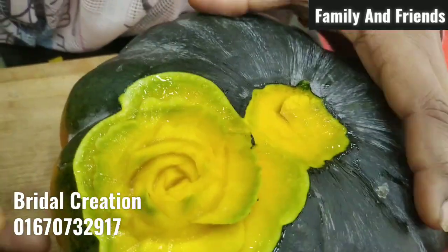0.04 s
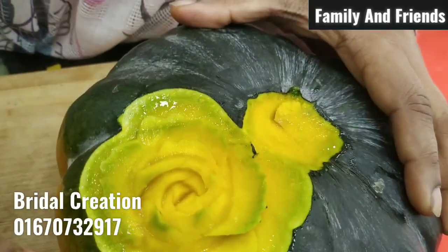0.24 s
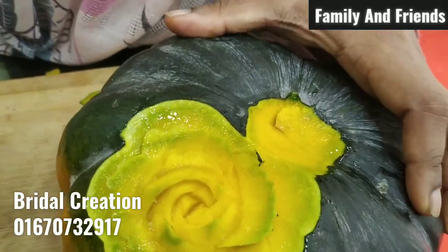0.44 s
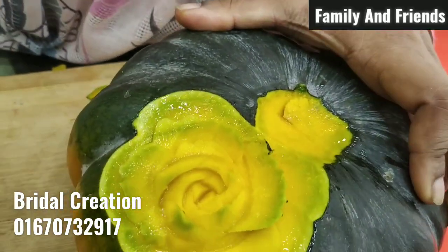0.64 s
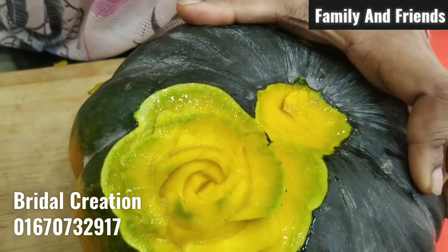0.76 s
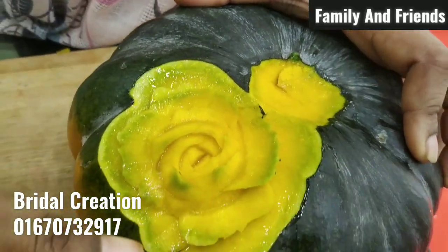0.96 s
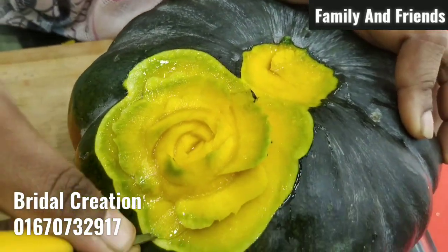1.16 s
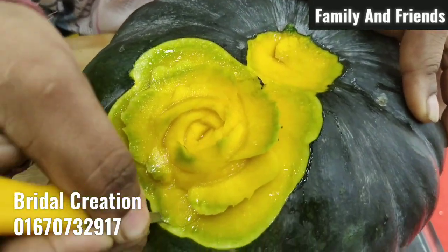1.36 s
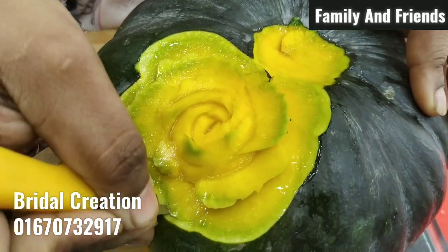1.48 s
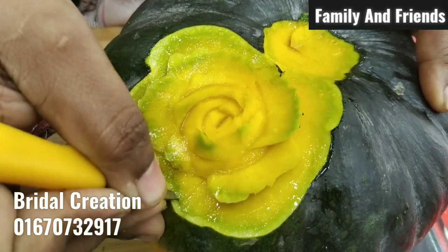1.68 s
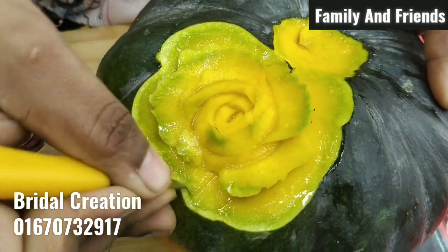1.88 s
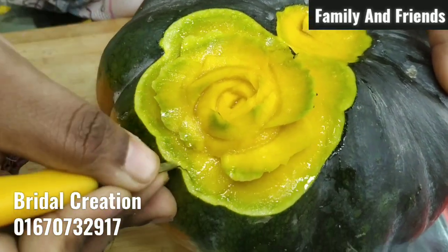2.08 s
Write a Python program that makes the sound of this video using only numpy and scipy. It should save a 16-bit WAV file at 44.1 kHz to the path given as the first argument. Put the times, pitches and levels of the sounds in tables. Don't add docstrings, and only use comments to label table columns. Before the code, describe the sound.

A small blade carves pumpkin rind, close and dry in a quiet room with low hum and faint hiss. Until 0.55 s the fruit shudders low on its board under a biting scrape, a softer drag and tiny snaps. From 0.64 to 1.05 s crisp cracks come in a row, then sparser ones at 1.28, 1.54 and 1.83-1.94 s. Low air puffs buffet the left around 1.4 and 1.8-2.1 s, with soft taps late.

```python
import sys
import numpy as np
from scipy import signal
from scipy.fft import rfft, irfft
from scipy.io import wavfile

SR = 44100
rng = np.random.default_rng(int(sys.argv[2]) if len(sys.argv) > 2 else 0)


def level_to_linear(level):
    exponent = np.asarray(level, float) / 20
    return 10 ** exponent


def wrap_up_sound(samples):
    columns = np.atleast_2d(samples).T
    tamed = np.clip(columns, -1, 1)
    steps = np.round(tamed * 32767).astype(np.int16)
    wavfile.write(sys.argv[1], SR, steps)


N = 93315

# f/Hz, level/dB per Hz
ROOM_SPECTRUM = [(20, -6), (60, 3), (110, -10), (200, -15.5), (450, -20), (1100, -29.5), (4500, -36.5)]
# f/Hz, correlation/1
ROOM_LIKENESS = [(60, 0.72), (240, 0.86), (950, 0.13), (3770, 0.11), (15000, -0.23)]
# f/Hz, width/Hz, level/dB
ROOM_MODES = [(150.5, 11.2, -58), (241, 30, -66), (374.2, 20.6, -66)]
# f/Hz, level/dB per Hz
HISS_SPECTRUM = [(1000, -2), (3000, 33.5), (5000, 27), (7000, -51), (11000, 2), (16000, -17.5)]
ROOM_DB, HISS_DB, HISS_RIGHT_DB, HISS_PATCH_DB = -48.5, -70, -2.5, 2

# t/s, level/dB
GUST_LEVEL = [(0, -43), (.3, -37.5), (.5, -43), (.7, -39), (.85, -40.5), (1.1, -38.5), (1.4, -37.5),
              (1.72, -40.5), (1.8, -26.5), (2.05, -27.5), (2.2, -58)]
GUST_CUT_HZ, GUST_LUMPS_DB = 47.3, 0.06
SWAY_DB, SWAY_HZ = -35, 6.7

# t/s, level/dB
SHUDDER_LEVEL = [
    (.04, -42),
    (.07, -31.5),
    (.12, -65),
    (.27, -42),
    (.31, -35),
    (.44, -36),
    (.49, -49),
]
SHUDDER_ORDERS_DB = [0.5, -15.5, -22, -19.5]
SHUDDER_HZ = 77.4

# t/s, level/dB
RUB_STROKES = [
    [(.064, -80), (.07, -51), (.094, -54), (.099, -42), (.108, -38), (.135, -40), (.16, -46), (.2, -52),
     (.31, -61)],
    [(.316, -70), (.319, -49), (.345, -49), (.36, -55), (.44, -59), (.495, -54), (.515, -60), (.55, -58),
     (.58, -70)],
]
# f/Hz, level/dB per Hz
RUB_SPECTRUM = [(300, -7), (900, -7.5), (1600, -7), (3000, -8), (6000, -1), (12000, 4.5), (16000, -1)]
RUB_LOW_DB = [5, -0.5]
RUB_GAIN_DB, RUB_GRAIN_DB = 3.5, 3.0
RUB_FLICKER_DB, RUB_FLICKER_HZ = 1.6, 90

# t/s, peak/dB, length/s, flesh/dB, edge/dB
FIRST_BITE = (.098, -35, .004, 12, -3)
# t/s, peak/dB, length/s, flesh/dB, edge/dB
SLIPS = [(0.6397, -43.5, 0.0065, -6, 7), (0.6758, -33.5, 0.0079, -1, 0), (0.7141, -25.5, 0.0054, 0, -4),
         (0.7668, -22.5, 0.0052, 1.5, -1.5), (0.836, -21.5, 0.0049, 1, -1.5),
         (0.9194, -22, 0.0051, 1.5, 2.5), (1.0242, -22.5, 0.0063, -1.5, 1), (1.283, -27, 0.0048, -5.5, 2.5),
         (1.5419, -22.5, 0.0053, -3.5, 2), (1.8327, -21, 0.0045, 1, -1), (1.8981, -25, 0.0052, -2, -0.5),
         (1.9433, -22, 0.0052, -8.5, -2.5)]
# f/Hz, width/Hz, level/dB
FLESH_MODES = [(390, 216, -8), (1100, 430, -13.5), (1730, 198, -6.5), (2912, 187, -9.5)]
BLADE_MODES = [(3800, 310, -6), (4463, 252, -1.5), (5090, 480, -7), (6370, 610, -0.5), (8660, 610, -4)]
EDGE_MODES = [(10790, 2180, -2), (13270, 1570, 2), (14100, 1480, 2)]
SLIP_RISE_S, SLIP_FALL_S = .0015, .0007
SLIP_GAIN_DB, SLIP_GRAIN_DB = 1, 3
FIBRES_PER_S, FIBRES_SHARED = 14000, .45

# t/s, peak/dB
SNAPS = [
    (0.218, -39),
    (0.243, -37),
    (0.3414, -33),
    (0.3897, -34.5),
    (0.4004, -35.5),
    (0.4224, -58),
    (0.4577, -38),
    (0.5003, -34.5),
]
# t/s, level/dB
CONTACT_LEVEL = [(.55, -57.5), (.66, -61.5), (1.06, -60), (1.13, -65), (1.17, -55.5), (1.28, -57.5),
                 (1.33, -91), (1.5, -73), (1.56, -68), (1.62, -97), (1.74, -59), (1.8, -57), (1.96, -58.5),
                 (2.05, -63.5), (2.08, -57.5), (2.2, -64)]
CONTACT_CUT_HZ = 7500

# t/s, level/dB, f/Hz
PUFFS = [(0.923, -27, 46.4), (1.014, -37.5, 90.5), (1.411, -15.5, 53.6), (1.441, -18, 76),
         (1.455, -22.5, 37.7), (1.792, -12.5, 52), (1.819, -17, 45.7), (1.867, -17, 45.6),
         (1.901, -9.5, 39.8), (1.962, -11.5, 52), (1.987, -15, 47), (2.02, -11.5, 45), (2.053, -18, 47.5),
         (2.077, -22, 65)]
PUFF_CYCLES, PUFF_SUCK_SPEED = 0.43, 1.384
# t/s, level/dB
TAPS = [(2.1, -37.5), (1.885, -31), (1.951, -40.5), (1.971, -37.5), (1.783, -43.5), (2, -62), (2.005, -46),
        (2.1, -43.5)]
TAP_HZ, TAP_WIDTH_HZ, TAP_S = 430, 590, .0004

# f/Hz, width/Hz, level/dB
LEFT_CAVITY = [(4970, 400, -0.5), (6240, 400, 8)]
LEFT_LAG_S, LEFT_CUT_HZ, LEFT_DB = .00048, 5660, 2.5
ECHO_DB, ECHO_DELAY_S, ECHO_T60_S, ECHO_HZ = -40.5, 0.0052, 0.29, 4220
CUTOFF_HZ, FADE_S = 16050, .012


def in_time(rows):
    s, v = np.transpose(rows)
    return np.interp(np.arange(N) / SR, s, v, left=-120, right=-120)


def at_hz(points, hz):
    f, v = np.transpose(points)
    return np.interp(np.log(hz), np.log(f), v)


def bins_hz():
    return np.maximum(np.arange(N // 2 + 1) * SR / N, 10)


def rms_one(x):
    return x / np.sqrt(np.mean(x ** 2) + 1e-20)


def cut(x, hz, kind, order=2):
    return signal.sosfilt(signal.butter(order, hz, kind, fs=SR, output="sos"), x)


def drift(rate_hz):
    r = np.exp(-2 * np.pi * rate_hz / SR)
    walk = signal.lfilter([1], [1, -2 * r, r * r], rng.standard_normal(N + SR))
    return rms_one(walk[SR:])


def slow_air(low_hz, high_hz, order):
    low = cut(rng.standard_normal(N + SR), high_hz, "low", order)
    return rms_one(cut(low, low_hz, "high")[SR:])


def resonate(x, peaks):
    out = 0
    for k, (hz, width_hz, db) in enumerate(peaks):
        r = np.exp(-np.pi * width_hz / SR)
        b = (1 - r * r) / 2 * level_to_linear(db) * (-1) ** k
        poles = [1, -2 * r * np.cos(2 * np.pi * hz / SR), r * r]
        out = out + signal.lfilter([b, 0, -b], poles, x + 1e-18)
    return out


def colour(x, points):
    return irfft(rfft(x) * level_to_linear(at_hz(points, bins_hz())), N)


def grains(spread_db):
    sizes = level_to_linear(spread_db * np.minimum(rng.exponential(1, (2, N)), 4))
    signed = sizes * rng.choice([-1, 1], (2, N))
    own, right = signed * (rng.random((2, N)) < FIBRES_PER_S / SR)
    left = np.sqrt(FIBRES_SHARED) * right + np.sqrt(1 - FIBRES_SHARED) * own
    return rms_one(np.array([left, right]))


def room_tone():
    mid, side = rfft(colour(rng.standard_normal((2, N)), ROOM_SPECTRUM))
    alike = np.clip(at_hz(ROOM_LIKENESS, bins_hz()), -1, 1)
    hum = irfft(np.sqrt(1 + alike) * mid + np.sqrt(1 - alike) * side * [[1], [-1]], N)
    modes = np.zeros(N)
    for hz, width_hz, db in ROOM_MODES:
        modes += level_to_linear(db) * rms_one(resonate(rng.standard_normal(N), [(hz, width_hz, 0)]))
    hiss = rms_one(colour(rng.standard_normal((2, N)), HISS_SPECTRUM))
    hiss = hiss * level_to_linear(HISS_DB + HISS_PATCH_DB * drift(18)) * level_to_linear(np.array([[0], [HISS_RIGHT_DB]]))
    return level_to_linear(ROOM_DB) * rms_one(hum) + modes + hiss


def gusts():
    gust = slow_air(9.6, GUST_CUT_HZ, order=3)
    sway = level_to_linear(SWAY_DB) * slow_air(2.9, SWAY_HZ, order=2)
    return gust * level_to_linear(in_time(GUST_LEVEL) + GUST_LUMPS_DB * drift(20)) + sway


def shudder():
    phase = 2 * np.pi * np.cumsum(SHUDDER_HZ * (1 + 0.034 * drift(23))) / SR
    tone = sum(level_to_linear(db) * np.sin((k + 1) * phase) for k, db in enumerate(SHUDDER_ORDERS_DB))
    return tone * level_to_linear(in_time(SHUDDER_LEVEL))


def rubs():
    flicker_db = RUB_FLICKER_DB * drift(RUB_FLICKER_HZ)
    grain = rms_one(colour(grains(RUB_GRAIN_DB), RUB_SPECTRUM)) * level_to_linear(RUB_GAIN_DB + flicker_db)
    low, high = cut(grain, 2800, "low"), cut(grain, 3050, "high")
    out = np.zeros((2, N))
    for stroke, low_db in zip(RUB_STROKES, RUB_LOW_DB):
        out += level_to_linear(in_time(stroke)) * (high - level_to_linear(low_db) * low)
    return out


def slips():
    t, tear = np.arange(N) / SR, grains(SLIP_GRAIN_DB)
    flesh, blade, edge = np.zeros((3, 2, N))
    for s, db, length_s, flesh_db, edge_db in [FIRST_BITE, *SLIPS]:
        rise = np.clip((t - s) / SLIP_RISE_S, 0, 1)
        fall = np.exp(-np.maximum(t - s - length_s, 0) / SLIP_FALL_S)
        slip = level_to_linear(db + SLIP_GAIN_DB) * rise * fall * tear
        flesh += level_to_linear(flesh_db) * slip
        blade += slip
        edge += level_to_linear(edge_db) * slip
    return resonate(flesh, FLESH_MODES) + resonate(blade, BLADE_MODES) + resonate(edge, EDGE_MODES)


def snaps():
    clicks = np.zeros(N)
    for s, db in SNAPS:
        clicks[int(s * SR)] = level_to_linear(db + 12)
    return cut(clicks, 6700, "high")


def wet_contact():
    fizz = rms_one(cut(grains(0.77), CONTACT_CUT_HZ, "high"))
    return level_to_linear(in_time(CONTACT_LEVEL) + 2.0 * drift(25)) * fizz


def echoes(x):
    r = level_to_linear(-120 / (ECHO_T60_S * SR))
    energy = signal.lfilter([1 - r], [1, -r], np.roll(x, int(ECHO_DELAY_S * SR)) ** 2)
    tail = resonate(rng.standard_normal((2, N)), [(ECHO_HZ, 1300, 0), (10000, 9000, -15)])
    return level_to_linear(ECHO_DB + 18) * np.sqrt(energy + 1e-18) * rms_one(tail)


def puffs():
    t, out = np.arange(N) / SR, np.zeros(N)
    for s, db, hz in PUFFS:
        turns = (t - s) * hz * np.where(t < s, PUFF_SUCK_SPEED, 1 / PUFF_SUCK_SPEED)
        out += level_to_linear(db - 1.5) * np.sin(2 * np.pi * turns) * np.exp(-(turns / PUFF_CYCLES) ** 2 / 2)
    return out


def taps():
    t, pulses = np.arange(N) / SR, np.zeros(N)
    for s, db in TAPS:
        pulses += level_to_linear(db + 11) * np.exp(-((t - s) / TAP_S) ** 2)
    return cut(resonate(pulses, [(TAP_HZ, TAP_WIDTH_HZ, 0)]), 820, "low", order=4)


def scene():
    tone = room_tone()
    air = gusts() + shudder()
    left, right = rubs() + slips() + snaps() + wet_contact()
    late = np.interp(np.arange(N) - round(LEFT_LAG_S * SR), np.arange(N), left)
    cavity = sum(resonate(late, [peak]) for peak in LEFT_CAVITY)
    shadowed = level_to_linear(LEFT_DB) * cut(late + cavity, LEFT_CUT_HZ, "low", order=3)
    left = shadowed + air + puffs() + taps()
    return np.array([left, right]) + echoes(right) + tone


def roll_off(x):
    return signal.sosfilt(signal.butter(12, 16800, fs=SR, output="sos"), x)


def record(dry):
    dull = signal.sosfilt(signal.cheby2(10, 30, CUTOFF_HZ, fs=SR, output="sos"), dry)
    mix = dull * np.clip((N - np.arange(N)) / (FADE_S * SR), 0, 1)
    return roll_off(mix)


dry = scene()
out = record(dry)
wrap_up_sound(out)
```